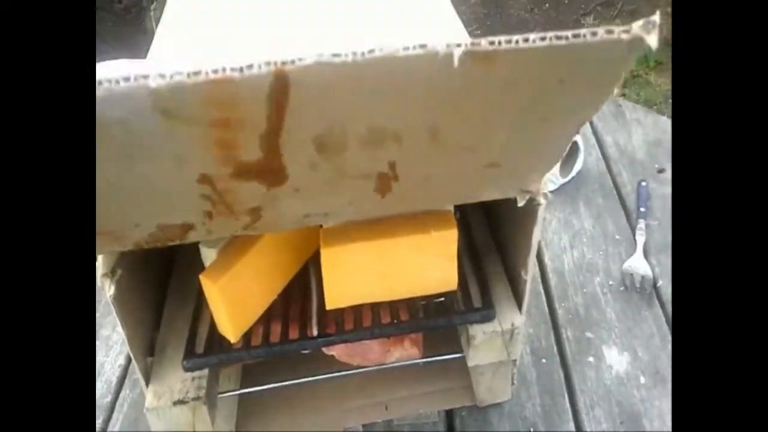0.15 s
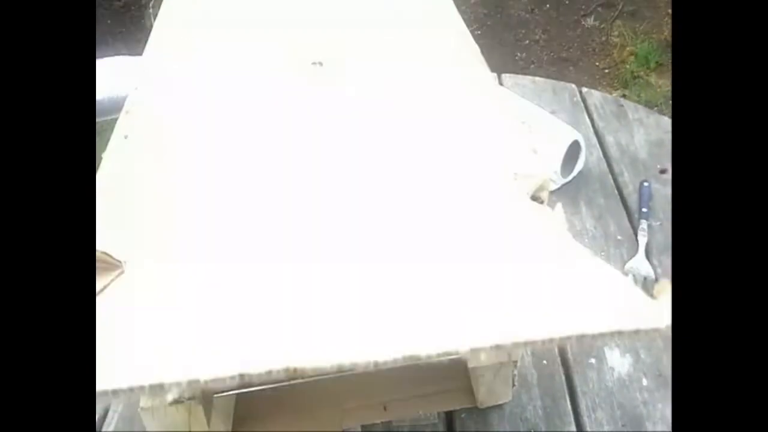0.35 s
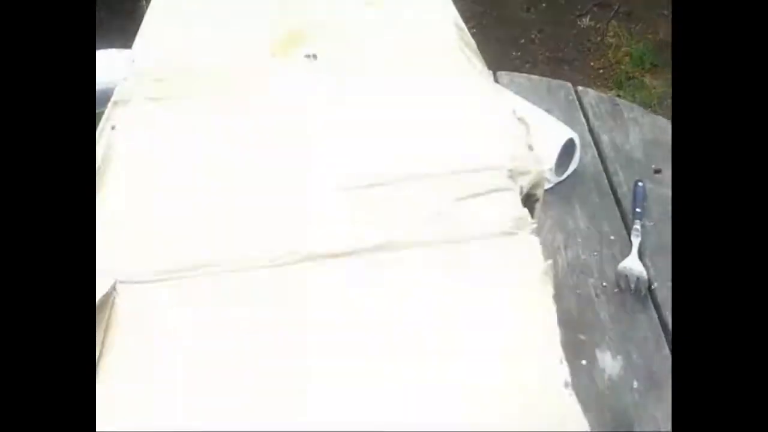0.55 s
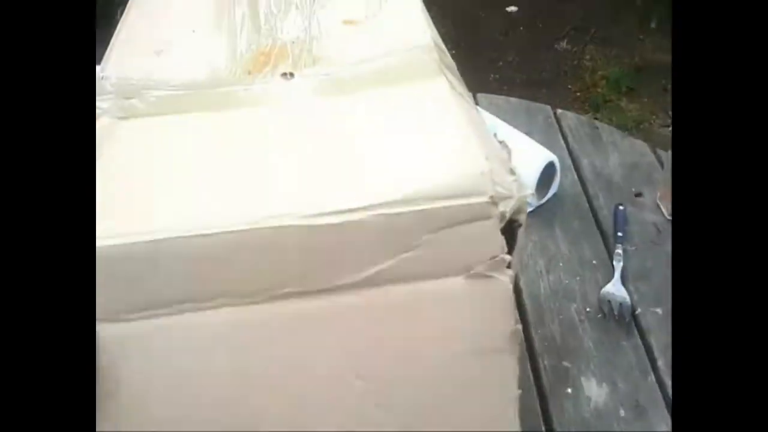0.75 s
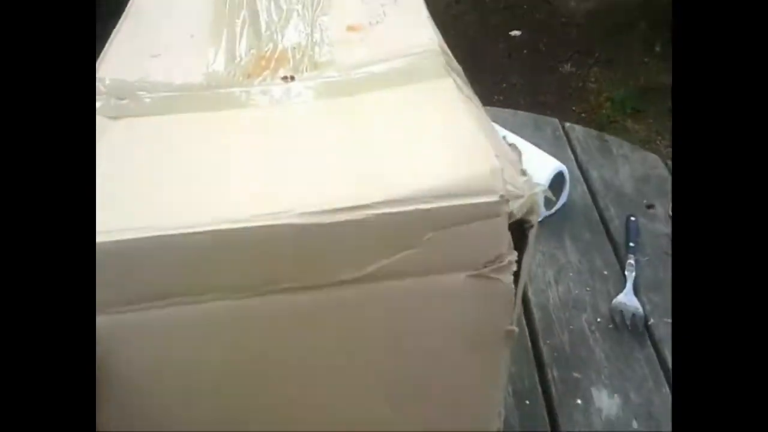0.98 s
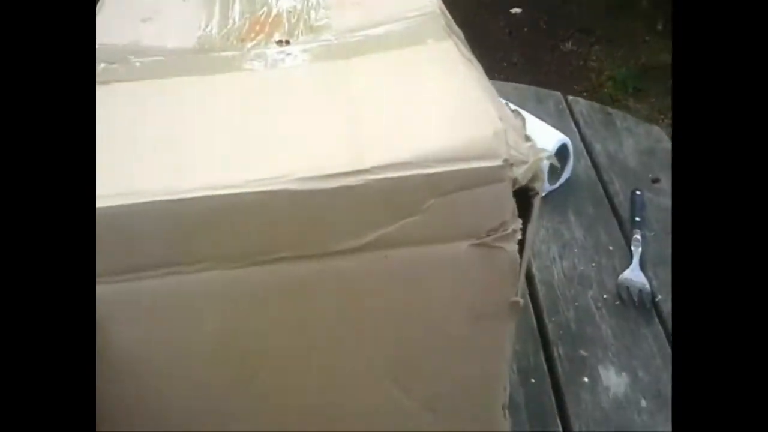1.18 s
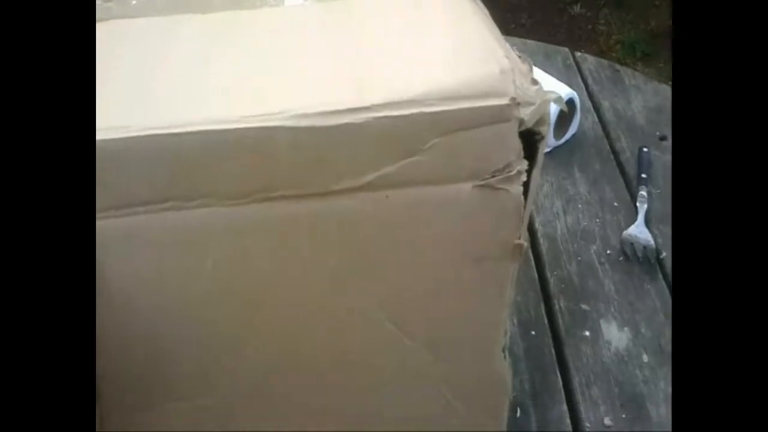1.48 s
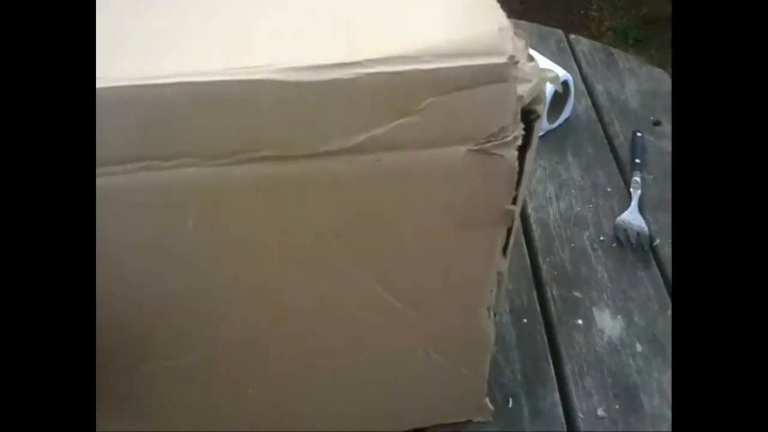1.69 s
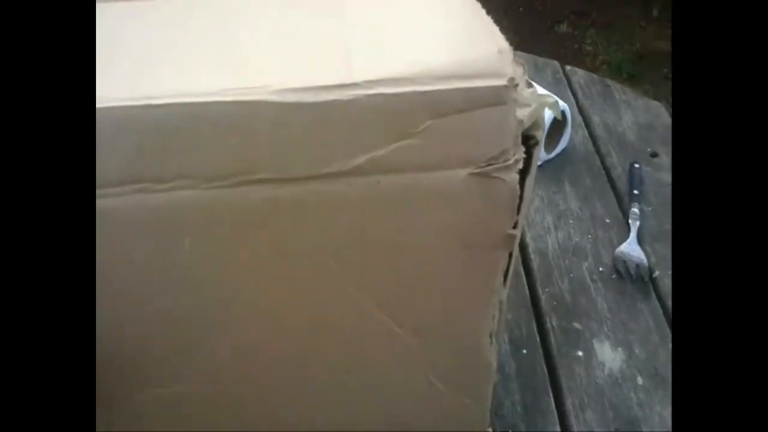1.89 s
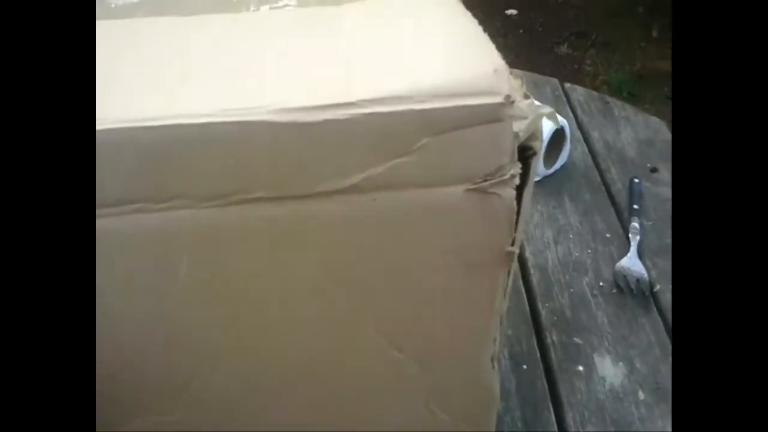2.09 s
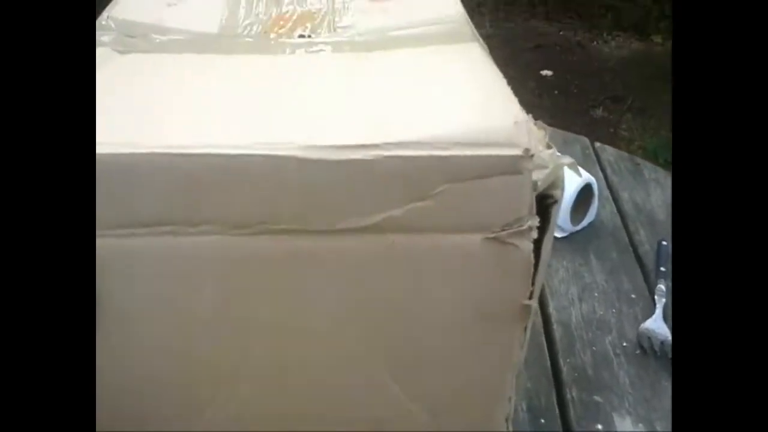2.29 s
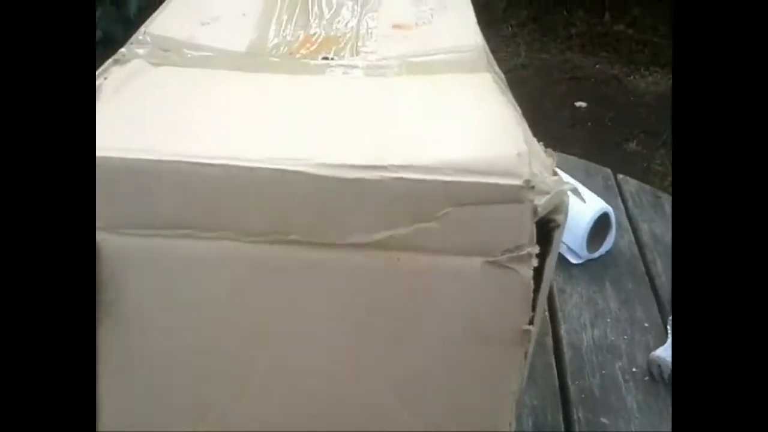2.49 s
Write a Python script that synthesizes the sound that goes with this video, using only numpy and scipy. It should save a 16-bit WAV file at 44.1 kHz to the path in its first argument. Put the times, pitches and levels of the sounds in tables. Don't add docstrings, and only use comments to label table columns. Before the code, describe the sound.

Cardboard box flap folding shut, close and dry outdoors. The first second is nearly silent, with muffled wind puffs around 0.4-0.55 s and a faint crackle near 0.6. From 1.0 s light scrapes begin, with a jerk at 1.35. The loudest crunch and boxy groan come at 1.55-1.7, a short creak at 1.83, then gritty stuttering rubs from 2.03, with humming drags and snaps near 2.4, easing by 2.6.

```python
import sys
import numpy as np
from scipy import signal
from scipy.fft import rfft, irfft
from scipy.io import wavfile
from scipy.ndimage import uniform_filter1d

SR = 44100
rng = np.random.default_rng(int(sys.argv[2]) if len(sys.argv) > 2 else 0)


def inscribe(sig):
    pcm = np.round(np.clip(np.atleast_2d(sig).T, -1, 1) * 32767)
    wavfile.write(sys.argv[1], SR, pcm.astype(np.int16))


def invert_db(level):
    return 10 ** (np.asarray(level, dtype=float) / 20)


N = 116865
TIME_S = np.arange(N) / SR


def rms_one(x):
    return x / np.sqrt(np.mean(x ** 2) + 1e-20)


def level(rows):
    time_s, level_db = np.transpose(rows)
    return invert_db(np.interp(TIME_S, time_s, level_db, left=-99))


def drift(rate_hz):
    r = np.exp(-2 * np.pi * rate_hz / SR)
    wander = signal.lfilter([1], [1, -2 * r, r * r], rng.standard_normal(N + SR))
    return rms_one(wander[SR:])


def resonate(x, pitch_hz, width_hz):
    r = np.exp(-np.pi * width_hz / SR)
    ring = [1, -2 * r * np.cos(2 * np.pi * pitch_hz / SR), r * r]
    return signal.lfilter([(1 - r * r) / 2, 0, (r * r - 1) / 2], ring, x)


def grains(per_s, spread_db):
    sizes = invert_db(spread_db * np.minimum(rng.exponential(1, N), 5)) * rng.choice([-1, 1], N)
    happens = rng.random(N) < per_s / SR
    return rms_one(sizes * happens + 1e-18)


def scrape(body, effort, per_s, patchy_db, judder_db):
    clicks = grains(per_s, spread_db=2.0) * invert_db(judder_db * drift(53.0))
    out = np.zeros(N)
    for k, (pitch_hz, width_hz, level_db) in enumerate(body):
        contact = invert_db(level_db + patchy_db * drift(15.0))
        out += (-1) ** k * contact * resonate(clicks, pitch_hz, width_hz)
    return rms_one(out) * level(effort)


# start_s, length_s, level_db, pitch_hz, width_share
CRUNCHES = [(0.0, 0.017, -54.5, 3760, 0.23), (0.061, 0.028, -51.5, 6140, 0.21),
            (0.47, 0.056, -49.5, 4860, 0.45), (.565, 0.083, -42.5, 4500, 0.4),
            (0.566, 0.089, -48.5, 1550, 0.18), (1.01, 0.019, -42.5, 4400, 0.24),
            (1.044, 0.057, -44.5, 7300, .8), (1.326, 0.031, -42, 7900, 1.7),
            (1.49, 0.0082, -32.5, 6420, 0.086), (1.508, 0.042, -44, 8800, 0.4),
            (1.563, 0.091, -26, 9300, 0.33), (1.578, 0.077, -28, 4450, 0.35),
            (1.638, 0.0072, -32, 4000, 0.12), (1.662, 0.048, -39, 9000, 1.7),
            (1.678, 0.0043, -26.5, 4500, 1), (1.755, 0.0028, -37.5, 4000, 2),
            (1.829, 0.0055, -38, 4000, 0.42), (2.023, 0.098, -42, 7300, 0.31),
            (2.114, 0.035, -35.5, 4200, 0.78), (2.411, 0.012, -31, 5230, 0.37),
            (2.43, 0.0077, -28.5, 3660, 0.26), (2.54, 0.0042, -37.5, 4070, 2),
            (2.563, 0.01, -41.5, 4860, 0.41)]
# start_s, length_s, level_db,
# pitch_hz, width_share
MORE_CRUNCHES = [(0.941, 0.0065, -53.5, 4500, 0.43), (0.79, 0.016, -54, 2100, 1.1),
                 (1.064, 0.032, -51.5, 253, 0.08), (1.357, 0.034, -50, 251, 0.04),
                 (1.512, 0.02, -43.5, 630, 0.042), (1.594, 0.051, -44, 180, 0.42), (1.5, 0.018, -39, 270, 0.18),
                 (1.67, 0.048, -44, 232, 0.49), (1.818, 0.025, -45, 300, 0.54), (2.015, 0.061, -41.5, 317, 0.44),
                 (2.11, 0.047, -47, 264, 0.11), (2.1, 0.03, -47.5, 195, 0.23), (1.617, 0.023, -30, 1550, 0.19),
                 (1.48, 0.069, -56, 2180, 0.042), (1.855, 0.042, -47, 830, 2), (1.69, 0.05, -46, 1240, 1.7),
                 (1.08, 0.24, -46, 3480, 0.045), (1.086, 0.2, -48.5, 2370, 0.054), (1.36, 0.093, -46, 3560, 0.036),
                 (1.91, 0.1, -47.5, 2350, 0.05), (2.15, 0.12, -43.5, 2300, 0.053), (0.072, 0.011, -52, 3680, 0.06),
                 (0.974, 0.01, -58, 2010, 0.12), (0.475, 0.022, -54, 3880, 0.092), (0.478, 0.033, -60, 1550, 0.11),
                 (2.40, 0.064, -35.5, 3980, 0.48), (0.59, 0.058, -60.5, 280, 0.86),
                 (0.823, 0.008, -54.5, 147, 0.94), (2.11, 0.028, -41, 1560, 0.15), (2.2, 0.14, -45, 1530, 0.09),
                 (1.566, 0.014, -35, 2500, 1.0), (1.93, 0.086, -53, 320, 0.56), (1.695, 0.02, -40, 5600, 0.47),
                 (1.612, 0.01, -31.5, 1520, 0.29)]


def crunches():
    out = np.zeros(N)
    clicks = grains(12000.0, spread_db=2.0) * invert_db(0.55 * drift(47.0))
    for start_s, length_s, level_db, pitch_hz, width_share in CRUNCHES + MORE_CRUNCHES:
        i = int(max(start_s, 0) * SR)
        u = np.arange(int(2.1 * length_s * SR)) / SR / length_s
        shape = (u / 0.47 * np.exp(1 - u / 0.43)) ** 1.77
        width_hz = 1.58 * pitch_hz * width_share
        burst = resonate(clicks[i:i + len(u)], pitch_hz, width_hz)
        burst = resonate(burst, pitch_hz, width_hz)
        out[i:i + len(u)] += invert_db(level_db) * shape * rms_one(burst)
    return signal.sosfilt(signal.butter(3, 11870, fs=SR, output="sos"), out)


# pitch_hz, level_db (per Hz)
AIR = [(88, -5.5), (150, -4), (436, -16), (1240, -17), (1570, -15.5), (4390, -18), (4750, -20), (5230, -23),
       (15500, -19)]


def air():
    hz = np.fft.rfftfreq(N, 1 / SR) + 1
    pitch_hz, level_db = np.transpose(AIR)
    colour = invert_db(np.interp(np.log(hz), np.log(pitch_hz), level_db))
    return invert_db(-59) * rms_one(irfft(rfft(rng.standard_normal(N)) * colour, N))


# pitch_hz, width_hz, level_db
LOOSE = [(600, 350, -19), (1595, 90, -1.5), (2270, 120, -1), (2760, 82, -4), (3330, 85, -11.5),
         (3660, 94, 1), (4500, 190, -4), (5690, 500, -4.5), (7000, 700, -6.5), (10200, 3700, -10.5)]


def rustle():
    return scrape(LOOSE, [(0, -63.5)], 3000.0, patchy_db=4.0, judder_db=1.5)


# centre_s, peak_db, first_swing (sign and size)
PUFFS = [(0.084, -47.5, -0.74), (0.116, -46.5, 0.77), (0.153, -46, -0.68), (0.179, -46, -0.77),
         (0.214, -46, 0.58), (.428, -37.5, -0.28), (0.484, -37.5, 0.42), (0.52, -48, -0.94),
         (0.535, -42, 0.76), (0.552, -46.5, 1), (0.573, -46.5, -1.14), (.594, -47.5, -0.95),
         (0.639, -53, 1), (0.702, -46, 0.95), (0.722, -56.5, -2.27), (0.787, -44, -0.72),
         (0.821, -48.5, 0.78), (0.86, -46.5, -1.05), (0.944, -49.5, 0.98), (.978, -49, 1)]
# time_s, level_db
WIND = [(1.0, -74), (1.058, -58), (1.146, -64), (1.242, -52.5), (1.306, -64), (1.344, -52.5), (1.468, -58),
        (1.528, -82), (1.582, -50.5), (2.02, -51), (2.042, -43.5), (2.172, -57), (2.216, -44), (2.282, -64),
        (2.318, -44), (2.406, -58), (2.46, -47.5), (2.65, -58.5)]


def wind():
    band = signal.butter(2, [27, 80], "band", fs=SR, output="sos")
    rumble = rms_one(signal.sosfilt(band, rng.standard_normal(N + SR))[SR:])
    calm_db, puff_s, flutter_db = -69, 0.005, -53
    puffs = np.zeros(N)
    for centre_s, peak_db, first_swing in PUFFS:
        u = (TIME_S - centre_s) / puff_s
        puffs -= first_swing * invert_db(peak_db) * 1.57 * u * np.exp(-u ** 2 / 2)
    flutter = rms_one(resonate(rng.standard_normal(N), 255, 410.0))
    flutter = flutter * level([(1.5, -72), (1.62, flutter_db), (2.4, flutter_db), (2.6, -67)])
    return puffs - flutter + rumble * (invert_db(calm_db) + level(WIND))


# time_s, jump_db
CATCHES = [(0.5966, 1), (0.611, 6.5), (0.6156, -1), (0.6197, 4.2), (1.071, 5.5), (1.0812, 4.5),
           (1.1753, -2), (1.191, -0.5), (1.221, 2), (1.2575, 3.7), (1.2681, 2), (1.315, 4.5), (1.323, 6.5),
           (1.34, 5), (1.35, 10.5), (1.4188, 2.3), (1.4717, 6.5), (1.4975, 5), (1.5273, 4.5), (1.5335, 2),
           (1.6035, 6), (1.6438, 6), (1.6825, 5.5), (1.734, -1), (1.743, 8), (1.75, 3), (1.757, 8.5),
           (1.8189, 0), (1.8288, 7), (1.94, 2.6), (1.9516, -1), (1.9984, 2.8), (2.035, 3), (2.0428, 4),
           (2.0478, 4.5), (2.0863, 4.5), (2.1282, 2), (2.1374, 2.5), (2.2507, 4.5), (2.2685, 5),
           (2.2874, 4.5), (2.3, 6), (2.3397, 2), (2.4144, 3.5), (2.4345, 3.5), (2.4415, 4), (2.489, 4),
           (2.543, 1.5), (2.5673, 2.5), (2.6041, 2.8)]


def catches():
    rise_s, fall_s = 0.0013, 0.0028
    lift_db = np.zeros(N)
    for time_s, jump_db in CATCHES:
        away_s = TIME_S - time_s
        lift_db += jump_db * np.exp(-(away_s / np.where(away_s < 0, rise_s, fall_s)) ** 2)
    return invert_db(lift_db)


# time_s, level_db
SLIDE = [(1.0, -56.5), (1.018, -45), (1.537, -37.5), (1.546, -46.5), (1.606, -31), (1.698, -38),
         (1.72, -44), (1.762, -41), (1.79, -47), (1.826, -36), (1.864, -47.5), (2.056, -37), (2.382, -36),
         (2.438, -35.5), (2.47, -37.5), (2.506, -40), (2.566, -40), (2.65, -44)]
# pitch_hz, width_hz, level_db
EDGE = [(504, 150, -5.5), (1853, 260, -3), (2314, 300, -0.5), (3060, 570, -6), (3536, 123, 1),
        (3950, 197, -2.5), (4450, 287, -2), (5070, 650, -6), (5880, 940, -6), (8630, 2120, -10),
        (10130, 1850, -9.5), (14600, 6600, -14.5)]


def rub():
    out = scrape(EDGE, SLIDE, 9000.0, patchy_db=1.5, judder_db=0.53)
    return out - 0.82 * resonate(out, 1000, 760)


# time_s, level_db
PRESS = [(1.012, -47.5), (1.07, -44), (1.13, -51), (1.31, -56), (1.37, -35.5), (1.39, -50), (1.567, -43),
         (1.612, -26.5), (1.793, -45.5), (1.831, -32.5), (1.854, -48.5), (1.97, -61), (2.045, -34),
         (2.102, -46.5), (2.126, -40), (2.42, -37.5), (2.502, -47.5), (2.65, -57)]
# pitch_hz, width_hz, level_db
PANEL = [
    (330, 310, -15),
    (742, 59, -2.5),
    (992, 222, -5),
    (1550, 250, -3.5),
    (1974, 230, -9.5),
    (2970, 100, -12.5),
]


def groan():
    return invert_db(-2.0) * scrape(PANEL, PRESS, 4000.0, patchy_db=1.2, judder_db=3.5)


# time_s, level_db
DRAG = [
    (2.1, -49),
    (2.128, -36),
    (2.176, -46.5),
    (2.246, -40),
    (2.324, -45),
    (2.41, -34),
    (2.45, -47),
    (2.49, -70),
]
# pitch_hz, width_hz, level_db
FLAP = [
    (582, 58, -0.5),
    (673, 62, 5),
    (1520, 170, -8.5),
    (3080, 270, -7.5),
    (4400, 550, -30),
]


def hum():
    return scrape(FLAP, DRAG, 3000.0, patchy_db=0.9, judder_db=1.4)


def scene():
    board = rub() + groan() + hum() + crunches()
    return (rustle() + board * catches() + wind() + air())[None]


# pitch_hz, width_hz, depth_share
MIC_DIPS = [
    (7470, 1100, 0.2),
    (11200, 450, 0.34),
    (1020, 1560, 0.31),
]


def microphone(x):
    for pitch_hz, width_hz, depth_share in MIC_DIPS:
        x = x - depth_share * resonate(x, pitch_hz, width_hz)
    return x


def noise_gate(x):
    threshold_db, steepness, depth_db, start_db = -48, 2.92, -32, -6
    fall_db_s, open_s = 1034, 0.003
    loudness_db = 20 * np.log10(uniform_filter1d(np.abs(x), size=40) + 1e-9)
    wanted_db = np.clip(steepness * (loudness_db - threshold_db), depth_db, 0)
    wanted_db[0] = start_db
    fall_db = fall_db_s * TIME_S
    held = invert_db(np.maximum.accumulate(wanted_db + fall_db) - fall_db)
    r = np.exp(-1 / (open_s * SR))
    return x * signal.lfilter([1 - r], [1, -r], held, zi=[r * held[0]])[0]


TOP_HZ = 16080
# pitch_hz, bar_db (over the neighbourhood), wander_db
BAR = [
    (1500, -50, 1),
    (2600, -12, 2),
    (5000, -8, 2.5),
    (8000, -3, 3),
    (11000, 1.5, 4),
    (15000, 2.5, 4),
]


def reducer(x):
    hz, _, z = signal.stft(x, SR, nperseg=1024, noverlap=768)
    power = uniform_filter1d(np.abs(z) ** 2, size=3, axis=0)
    chance = uniform_filter1d(rng.standard_normal(z.shape), size=7)
    chance = rms_one(uniform_filter1d(chance, size=6, axis=0))
    pitch_hz, bar_db, wander_db = np.transpose(BAR)
    middle_db = np.interp(hz, pitch_hz, bar_db)[:, None]
    spread_db = np.interp(hz, pitch_hz, wander_db)[:, None]
    bar = invert_db(middle_db + spread_db * chance) ** 2
    neighbourhood = uniform_filter1d(power, size=60, axis=0)
    kept = np.where(power > bar * neighbourhood, 1, invert_db(-18))
    treble_lift = invert_db(1 * hz / TOP_HZ)[:, None]
    return signal.istft(z * kept * treble_lift, SR, nperseg=1024, noverlap=768)[1][:N]


def band_limit(x):
    return signal.sosfilt(signal.butter(12, 16680, fs=SR, output="sos"), x)


def record(dry):
    x = reducer(noise_gate(microphone(dry[0])))
    x = signal.sosfilt(signal.cheby2(24, 70, TOP_HZ, fs=SR, output="sos"), x)
    return band_limit(x[None])


dry = scene()
out = record(dry)
inscribe(out)
```